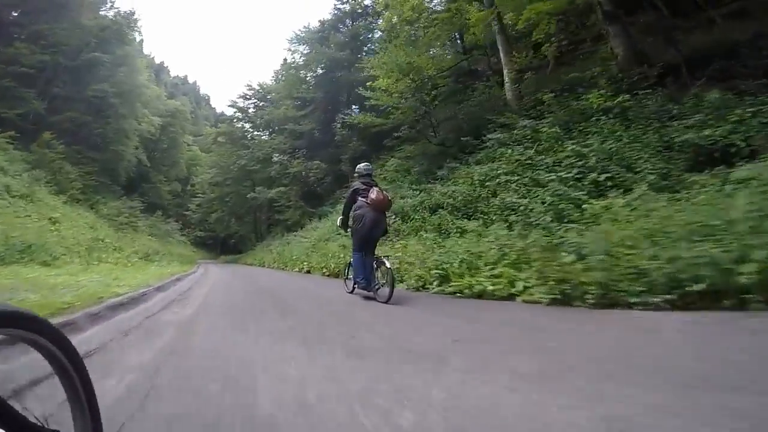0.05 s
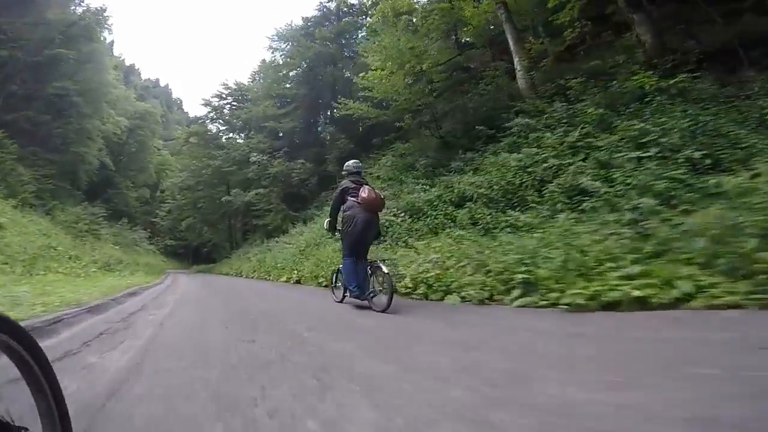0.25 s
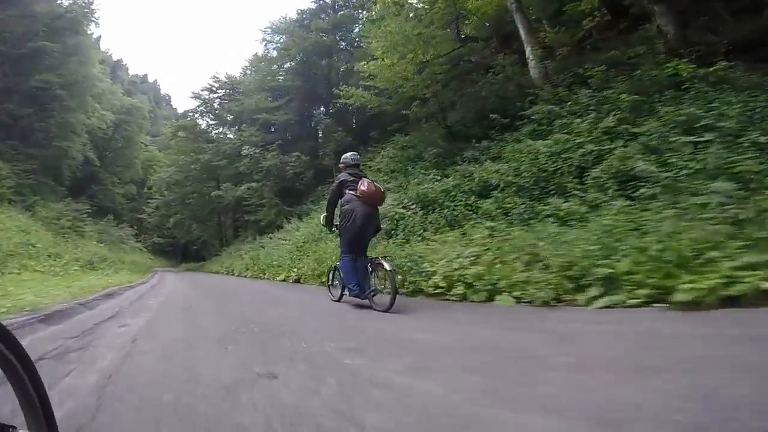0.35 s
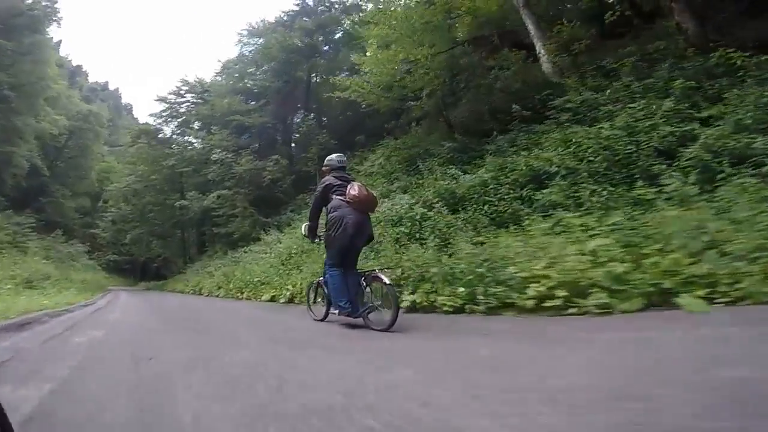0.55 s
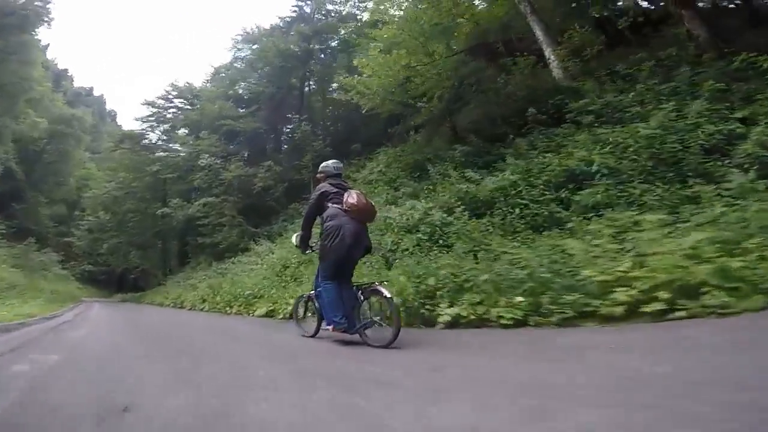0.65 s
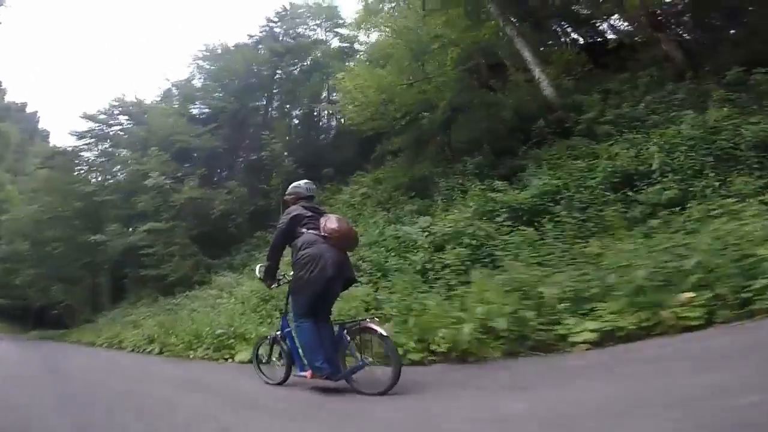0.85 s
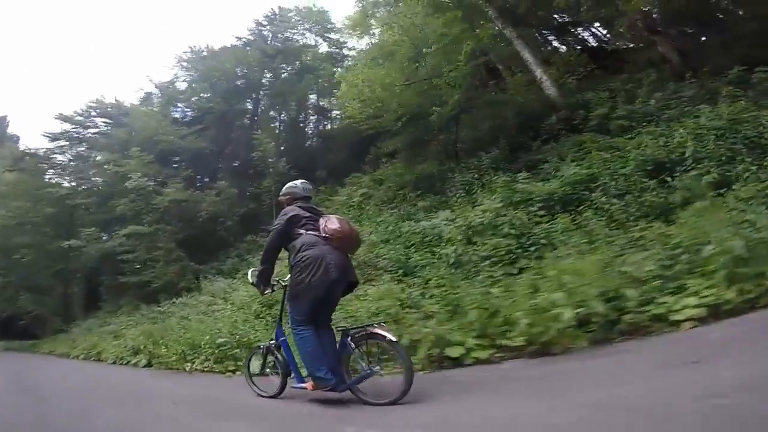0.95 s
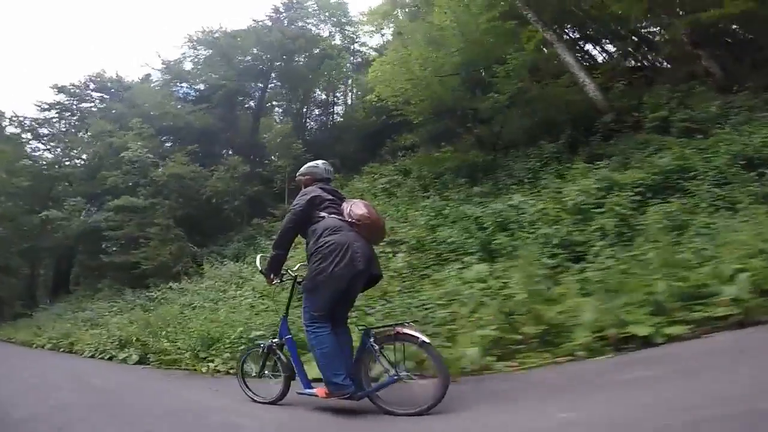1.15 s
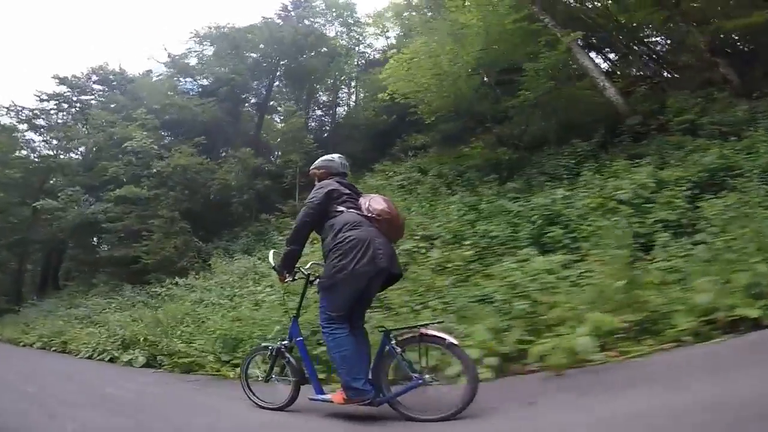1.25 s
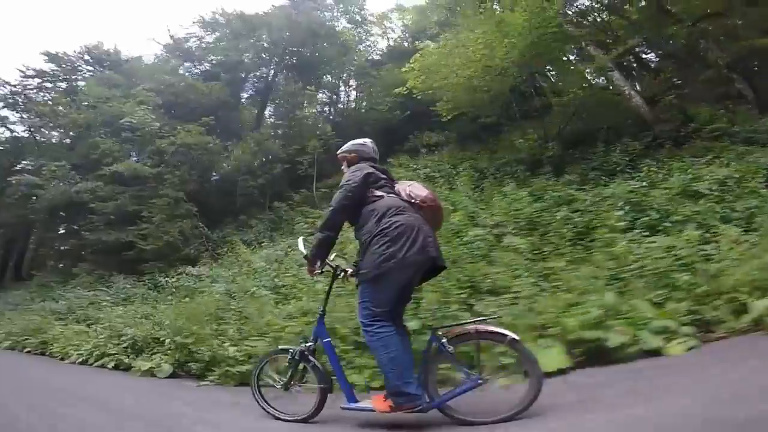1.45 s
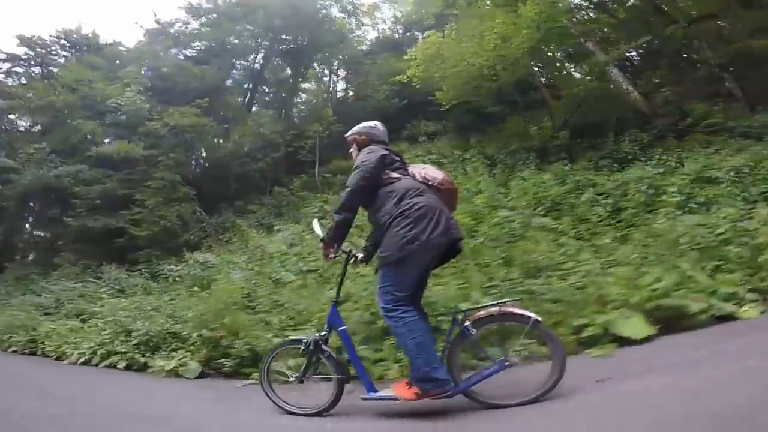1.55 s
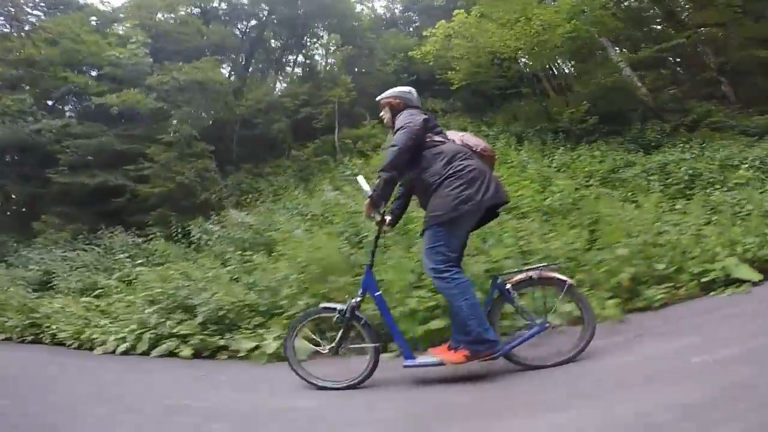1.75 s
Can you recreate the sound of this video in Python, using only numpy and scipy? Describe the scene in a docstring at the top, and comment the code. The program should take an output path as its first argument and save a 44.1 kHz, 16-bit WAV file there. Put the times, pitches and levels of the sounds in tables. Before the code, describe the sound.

Loose parts on a kick scooter rattle in a quick, irregular run of sharp knocks and snaps, close to the microphone. The rattling then stops, leaving a soft rush of tyres on asphalt and low wind rumble.

```python
"""A paved forest road, riding beside a kick scooter with the microphone fixed to the frame.
Bumps shake loose parts, which make ringing knocks, dry snaps and light ticks.
Each hit also makes the frame buzz and sets the microphone mount wobbling with a low thump.
Underneath, the tyres rush on the asphalt, wind buffets the microphone and the air hisses faintly."""
import sys
import numpy as np
from scipy import signal
from scipy.fft import rfft, irfft
from scipy.io import wavfile

SR = 44100
rng = np.random.default_rng(int(sys.argv[2]) if len(sys.argv) > 2 else 0)


def to_wav(sig):
    """Store sig (one row per channel, or 1-D mono) as 16-bit WAV at the path in sys.argv[1].

    Samples outside -1..1 are clipped; the rate is SR.
    """
    pcm = np.clip(np.atleast_2d(sig), -1, 1) * 32767
    pcm = np.round(pcm).astype(np.int16)
    wavfile.write(sys.argv[1], SR, pcm.T)  # frames by channels


N = 79380
TIME = np.arange(N) / SR


def knocks():
    """A loose part knocks on the frame and rings."""
    # hits: start_s, level_db, brightness_db_per_octave, contact_ms, buzz_db, thump_db, thump_hz
    hits = [(.3663, -2, -14, 0.045, -22.5, -18, 57.5), (.5452, 1, -4.5, 0.051, -23.5, -9.5, 36),
            (.6043, 2, 7.5, .09, -20.5, -10, 35.2), (.6482, 4, 5.5, 0.1, -22.5, -8, 36.4),
            (.6945, 1, 4, 0.24, -23, -9, 36.4), (.7484, 2, -4.5, 0.091, -25.5, -8.5, 38.5),
            (.8144, 2.5, -4.7, 0.12, -24.5, -8, 40.7), (.8700, -12.5, 2, 0.078, -31.5, -9, 41.5)]
    # the tones the part rings with: pitch_hz, level_db, fade_s
    tones = [(420, -12.5, 0.0087), (919, -13.5, 0.011), (1051, -15, 0.0411), (1408, -1.4, 0.0036),
             (1911, -6.5, 0.007), (1844, -33, 0.09), (2706, -17.5, 0.0056), (3240, -26.5, 0.0069),
             (4410, -23.5, 0.0061), (5950, -20, 0.0042), (5986, -27, 0.0059), (8050, -38.5, 0.0026),
             (12544, -36, 0.0011)]
    return rattle(hits, tones)


def snaps():
    """The mount snaps sharply, or bumps dully when the contact lasts longer."""
    # hits: start_s, level_db, brightness_db_per_octave, contact_ms, buzz_db, thump_db, thump_hz
    hits = [(.2222, -17, -3, 0.16, -39, -9.5, 58.5), (.2315, -1, 1.5, 0.1, -21, -2, 36.4),
            (.3010, -14, -6.5, 0.052, -30, -12, 52), (.3232, -9.5, 4, 0.13, -28.5, -10.5, 33.3),
            (.3521, -19, 0.5, .13, -36, -15, 34), (.3801, -22.5, 4, 0.18, -55, -37, 40.3),
            (.8712, -2.5, -9, 1.57, -58, -24, 40), (.9086, -11, 10.5, 1.16, -32.5, -16, 37.4),
            (1.0564, -15.5, -22.5, 0.1, -32.5, -11.5, 30.6), (1.0805, -9.5, -8, 2.5, -58, -23, 46),
            (1.0960, -17.5, -2, 0.072, -36, -17, 33.5), (1.1271, -10.5, -0.5, 0.12, -30, -12, 33),
            (1.154, -27, 3, 4.8, -65, -22, 33.7)]
    # the tones the mount rings with: pitch_hz, level_db, fade_s
    tones = [(610, -17.5, 0.0051), (828, -1, 0.0049), (1133, -6, 0.013), (1400, -2.5, .005),
             (1866, -2.5, 0.0073), (1880, -15, 0.038), (2554, -3.5, 0.0069), (2873, -8, 0.0096),
             (3693, -8, 0.0067), (4380, -17, 0.0096), (5150, -7.5, 0.0022), (7400, -34, 0.0054),
             (8220, -19.5, 0.0017), (12000, -34, 0.0013)]
    return rattle(hits, tones)


def ticks():
    """Light taps on metal ring high and die away at once."""
    # hits: start_s, level_db, brightness_db_per_octave, contact_ms, buzz_db, thump_db, thump_hz
    hits = [(.7707, -18, 3, 0.14, -36, -23, 40.3), (.8008, -5, -5.5, 0.096, -37, -25.5, 40),
            (1.0565, -1, 3, 0.2, -58, -49, 40)]
    # the tones the metal rings with: pitch_hz, level_db, fade_s
    tones = [(2000, -16.5, 0.0085), (3930, -24, 0.006), (5150, -20, 0.0055), (6030, -21, 0.0028),
             (9900, -31.5, .005)]
    return rattle(hits, tones)


def rattle(hits, tones):
    """Each hit rings a part's own tones, jolts the mount and leaves a short buzz in the frame."""
    # tone colour of the frame's buzz: pitch_hz, level_db
    buzz_colour = [(200, 1.5), (600, -9.5), (1000, -3), (2000, -6), (3000, -11), (4300, -15), (6000, -21.5),
                   (7500, -31.5), (11000, -35.5), (16000, -50)]
    out, buzz_level = np.zeros(N), np.zeros(N)
    t = TIME[:N // 6]
    pitch_hz, tone_db, fade_s = np.transpose(tones)
    signs = (-1) ** np.arange(len(pitch_hz))  # every other tone swings the opposite way
    rings = signs[:, None] * np.sin(2 * np.pi * pitch_hz[:, None] * t) * fade(t, fade_s[:, None])
    octaves_up = np.clip(np.log2(pitch_hz / 1690), 0, 1.39)  # brightness acts above 1690 Hz
    for start_s, level_db, brightness, contact_ms, buzz_db, thump_db, thump_hz in hits:
        ringing = from_db(level_db + tone_db + brightness * octaves_up) @ rings
        cutoff_hz = min(1000 / contact_ms, .45 * SR)  # a longer contact sounds duller
        soften = signal.butter(2, cutoff_hz, fs=SR, output="sos")
        add(out, start_s, signal.sosfilt(soften, ringing))
        add(out, start_s, from_db(thump_db) * thump(t, thump_hz))
        add(buzz_level, start_s, from_db(buzz_db) * rise(t, rise_s=0.00027) * fade(t, fade_s=0.055))
    return out + buzz_level * noise(buzz_colour)


def thump(t, pitch_hz):
    """The jolted mount swings a few times at a very low pitch."""
    return -np.cos(2 * np.pi * pitch_hz * t) * rise(t, rise_s=0.00093) * fade(t, fade_s=0.15)


def tyres():
    """Tyres roll on asphalt: an even rush that flickers slightly with the surface."""
    # tone colour of the rush: pitch_hz, level_db
    colour = [(100, 2.5), (300, -7.5), (550, -8.5), (800, -12.5), (1100, -4.5), (1500, -5.5), (1950, 1.5),
              (2450, -1), (2800, -10), (3250, -17), (3800, -10.5), (4400, -15.5), (5000, -28.5),
              (6500, -32.5), (8000, -41), (16000, -70)]
    # loudness along the ride: time_s, level_db
    levels = [(0, -44.5), (.2, -42.5), (.5, -41), (1.0, -41), (1.4, -42), (1.8, -40.5)]
    flicker_db = 0.7 * drift(rate_hz=25)
    return from_db(in_time(levels) + flicker_db) * noise(colour)


def wind():
    """The head wind hits the microphone in gusts and makes a lumpy rumble."""
    # tone colour of the rumble: pitch_hz, level_db
    colour = [(12, 3), (30, 4.5), (50, -9.5), (80, -13.5), (130, -14.5), (200, -21.5), (320, -30.5),
              (700, -61.5)]
    # loudness along the ride: time_s, level_db
    levels = [(0, -32.5), (.15, -33.5), (.45, -30), (.95, -29.5), (1.3, -34.5), (1.37, -35.5),
              (1.55, -32.5), (1.72, -37), (1.8, -28.5)]
    gust_db = -drift(rate_hz=9)
    return from_db(in_time(levels) + gust_db) * noise(colour)


def air_hiss():
    """The air adds a faint, even hiss."""
    # tone colour of the hiss: pitch_hz, level_db
    colour = [(1500, -5.5), (5500, -4), (8000, -1.5), (14500, -15), (16000, -30)]
    return from_db(-71) * noise(colour)


def from_db(db):
    """Turn decibels into a number to multiply a sound by."""
    return 10 ** (np.asarray(db) / 20)


def in_time(points):
    """Join (time_s, value) points with straight lines, one value per sample."""
    return np.interp(TIME, *np.transpose(points))


def drift(rate_hz):
    """A smooth random wander with a typical size of 1."""
    pole = np.exp(-2 * np.pi * rate_hz / SR)
    slow = signal.lfilter([1], [1, -2 * pole, pole * pole], rng.standard_normal(2 * N))[N:]
    return slow / slow.std()


def noise(colour):
    """Noise with a typical size of 1; the colour sets only the balance of low and high pitches."""
    pitch_hz, level_db = np.transpose(colour)
    all_hz = np.maximum(np.fft.rfftfreq(N, 1 / SR), 1)
    gains = from_db(np.interp(np.log(all_hz), np.log(pitch_hz), level_db))
    shaped = irfft(rfft(rng.standard_normal(N)) * gains, N)
    return shaped / shaped.std()


def rise(t, rise_s):
    """Climb from 0 towards 1, about two thirds of the way in rise_s."""
    return 1 - np.exp(-t / rise_s)


def fade(t, fade_s):
    """Die away, dropping 60 dB in fade_s."""
    return np.exp(-np.log(1000) * t / fade_s)


def add(out, start_s, sound):
    """Mix a sound in at its start time."""
    start = int(start_s * SR)
    out[start:start + len(sound)] += sound[:N - start]


def scene():
    """Rattles close to the microphone over tyres and wind, in the open air."""
    return (knocks() + snaps() + ticks() + tyres() + wind() + air_hiss())[None]


def record(dry):
    """Clip the highest peaks and cut the treble above 15800 Hz."""
    treble_cut = signal.ellip(10, .1, 90, 15800, fs=SR, output="sos")
    return signal.sosfilt(treble_cut, np.clip(dry, -.9, .9))


dry = scene()
out = record(dry)
to_wav(out)
```